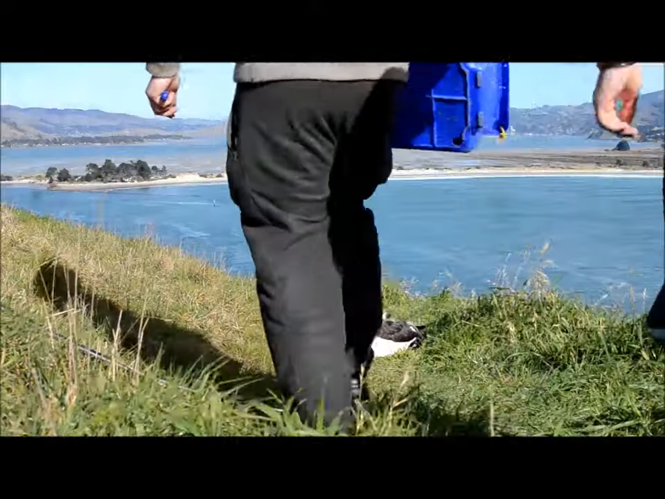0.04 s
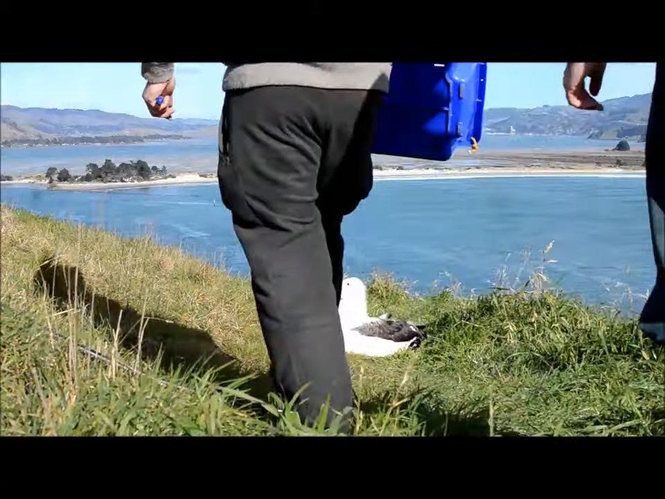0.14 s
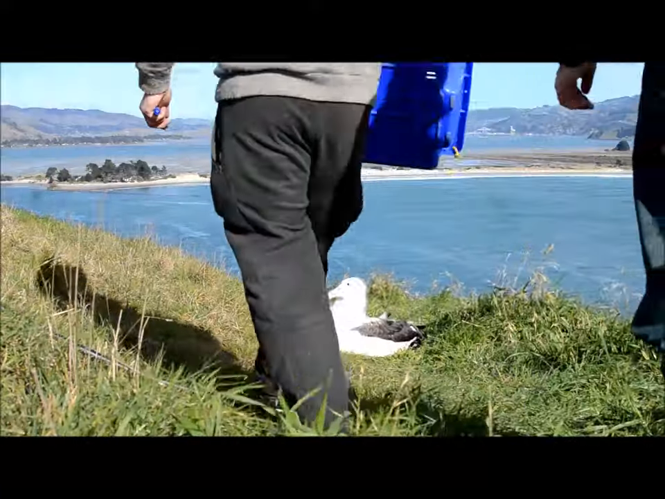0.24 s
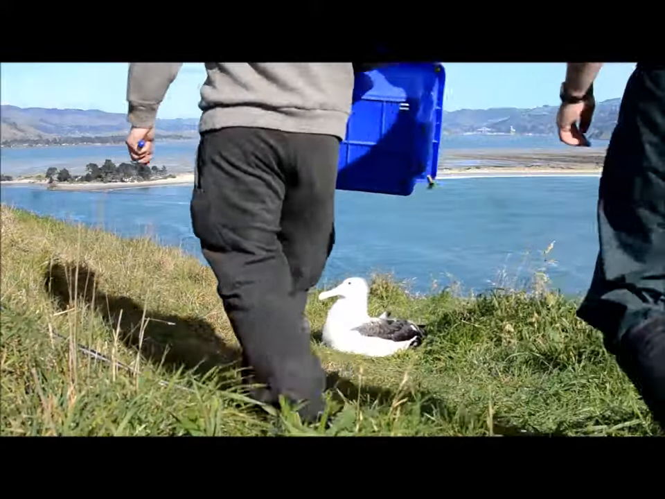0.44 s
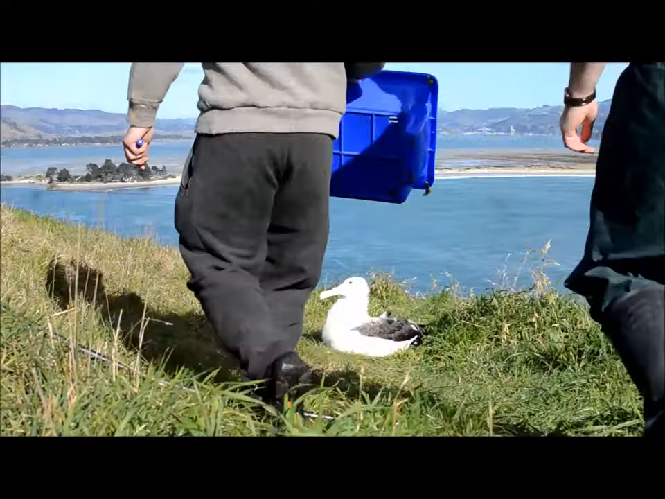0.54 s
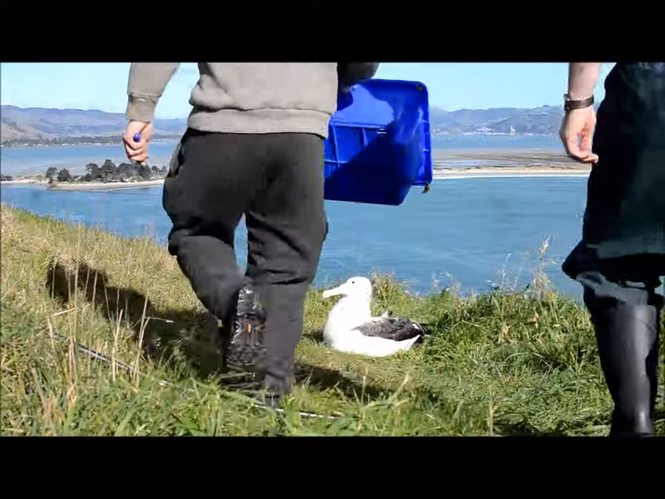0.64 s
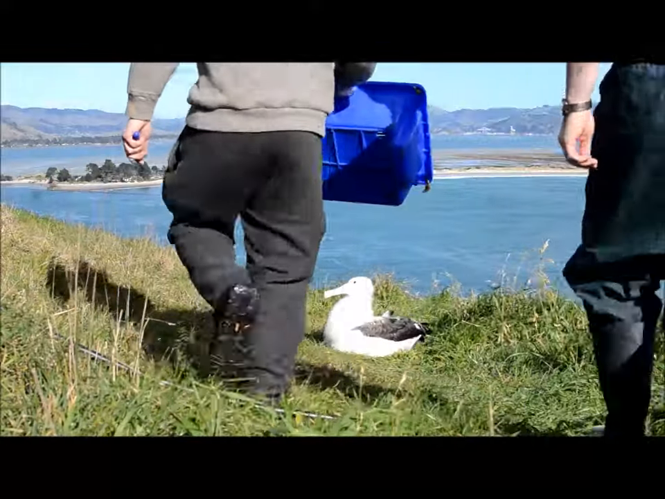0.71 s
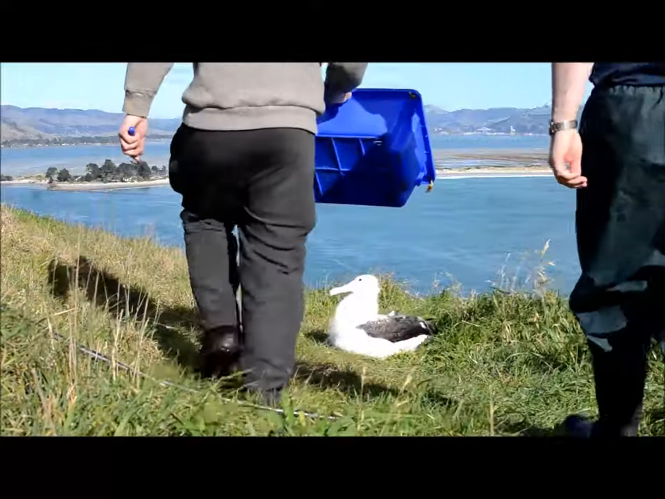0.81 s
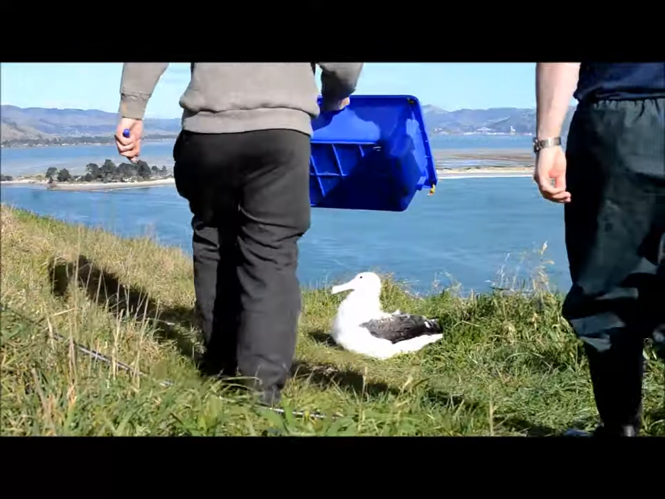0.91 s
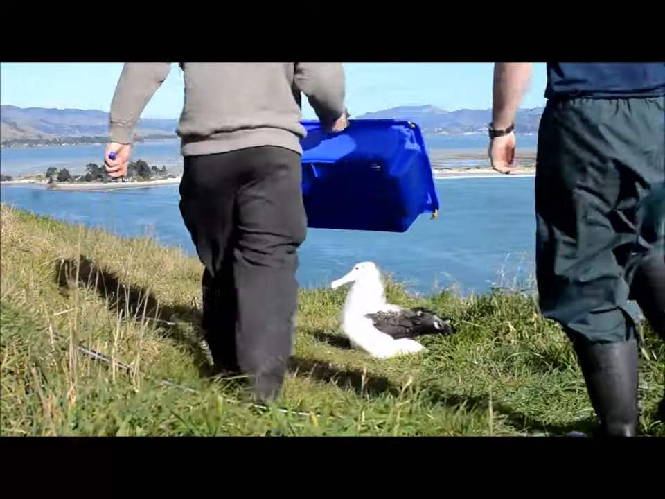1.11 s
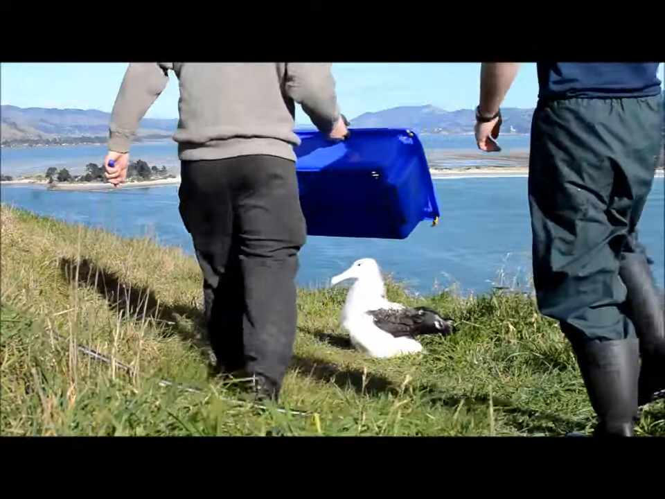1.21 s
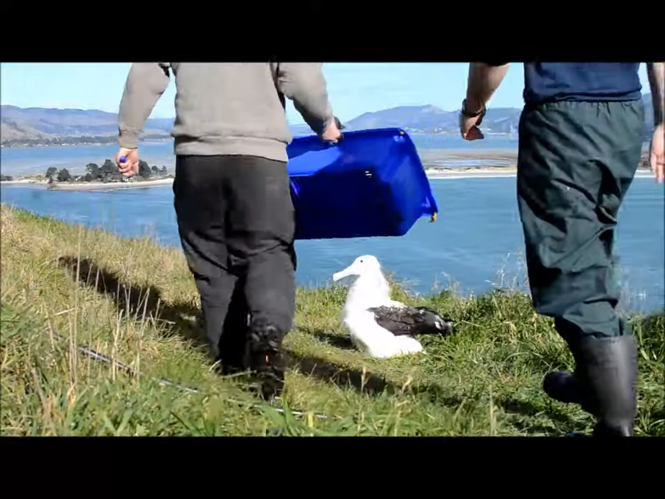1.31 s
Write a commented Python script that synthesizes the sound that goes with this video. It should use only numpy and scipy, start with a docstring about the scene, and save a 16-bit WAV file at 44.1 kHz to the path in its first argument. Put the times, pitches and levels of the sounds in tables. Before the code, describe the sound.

Wind thudding on the microphone, with people swishing faintly through long grass.

```python
"""Soft, dull thuds of wind on the microphone, out on an open hillside in long grass.
Gusts break into eddies right at the camera, over a low rumble; the strongest gust whistles faintly.
Just ahead two people walk: grass blades and trouser legs swish with the strides, and a few stalks tick.
Behind them the hillside hisses steadily. One microphone, mono."""
import sys
import numpy as np
from scipy.fft import rfft, irfft, next_fast_len
from scipy.io import wavfile
from scipy.ndimage import map_coordinates

SR = 44100
rng = np.random.default_rng(int(sys.argv[2]) if len(sys.argv) > 2 else 0)


def inscribe(sig):
    """Save sig as 16-bit PCM at rate SR to the path in sys.argv[1].

    A 1-D sig is mono; a 2-D sig holds one channel per row.
    Samples are clipped to [-1, 1] before scaling.
    """
    pcm = np.round(np.clip(np.atleast_2d(sig).T, -1, 1) * 32767)
    wavfile.write(sys.argv[1], SR, pcm.astype(np.int16))


N = 59535


def amp(db):
    """Decibels to gain."""
    return 10 ** (np.asarray(db) / 20)


def unit(x):
    """Scale to rms 1."""
    return x / np.sqrt(np.mean(x ** 2) + 1e-20)


def clock():
    """Time of each sample in seconds."""
    return np.arange(N) / SR


def curve(rows):
    """Join (seconds, value) rows with straight lines, one value per sample."""
    return np.interp(clock(), *np.transpose(rows))


def wobble(rate):
    """A smooth random curve, rate knots a second."""
    return map_coordinates(rng.standard_normal(N // 8), [clock() * rate], mode="wrap")


def filtered(x, response):
    """Pass x through a gain given as a function of frequency in Hz."""
    size = next_fast_len(N + 8192)
    return irfft(rfft(x, size) * response(np.fft.rfftfreq(size, 1 / SR)), size)[:N]


def noise(colour):
    """Noise of rms 1, coloured by (Hz, dB) rows."""
    knots_hz, db = np.transpose(colour)
    response = lambda hz: amp(np.interp(np.log(hz + 1), np.log(knots_hz), db))
    return unit(filtered(rng.standard_normal(N), response))


def eddy(length, bass_hz, corner_hz, size=4096):
    """One short random pressure swing of energy 1, held between its bass edge and its treble corner."""
    treble_order = 5.92  # steepness above the corner
    t = (np.arange(size) - size // 2) / SR
    hz = np.fft.rfftfreq(size, 1 / SR)
    window = np.exp(-.5 * np.abs(t / (.5 * length)) ** 3)
    swing = rng.standard_normal(size)
    for _ in range(3):  # flatten the spectrum while keeping the swing short
        swing = irfft(np.exp(1j * np.angle(rfft(swing * window))))
    u = 1j * hz / bass_hz
    highpass = u ** 2 / (1 + np.sqrt(2) * u + u ** 2)
    lowpass = (1 + (hz / corner_hz) ** 2) ** (-treble_order / 2)
    swing = irfft(rfft(swing * window) * highpass * lowpass)
    return swing / np.linalg.norm(swing)


def buffets():
    """Eddies thud right on the microphone; faster ones are louder and brighter."""
    # Each row: centre in seconds, length in seconds, level in dB, bass edge in Hz, treble corner in Hz.
    eddies = [(0.019, 0.0092, -48, 50, 780), (0.085, 0.017, -38.5, 169, 337),
              (0.145, 0.0068, -36, 59.7, 430), (0.1698, 0.0047, -20.5, 148, 483),
              (0.176, 0.007, -21, 111, 340), (0.2128, 0.0054, -18.5, 201.5, 470),
              (0.218, 0.0043, -15, 173, 410), (0.23, 0.0053, -19.5, 141, 496),
              (0.244, 0.0086, -20, 121, 964), (0.26, 0.014, -25, 50, 766), (0.285, 0.012, -18, 139, 1150),
              (0.2982, 0.014, -19.5, 91, 1140), (0.313, 0.012, -26.5, 50, 620),
              (0.321, 0.011, -22, 100, 785), (0.337, 0.0045, -10.5, 50, 1240),
              (0.344, 0.012, -16, 50, 1110), (0.354, 0.0038, -7, 50.4, 780),
              (0.363, 0.0057, -5, 50.5, 1210), (0.3681, 0.0035, -9, 120, 1950),
              (0.373, 0.011, -14, 140, 1220), (0.382, 0.0097, -29, 100, 870),
              (0.392, 0.0076, -10.5, 290, 1250), (0.4, 0.0029, -1.5, 91.5, 1213),
              (0.407, 0.022, -24.5, 90, 1120), (0.443, 0.007, -23, 50, 720),
              (0.452, 0.0078, -19.5, 140, 970), (0.467, 0.012, -26.5, 50.4, 660),
              (0.546, 0.02, -36.5, 119, 664), (0.599, 0.0054, -21.5, 118, 420),
              (0.629, 0.0096, -38, 122, 220), (0.699, 0.0066, -26.5, 164, 380),
              (0.713, 0.0062, -20, 115, 680), (0.718, 0.008, -22.5, 60.3, 330),
              (0.744, 0.0057, -17.5, 67.6, 513), (0.757, 0.0073, -13, 256, 970),
              (0.762, 0.006, -14, 48.4, 860), (0.828, 0.015, -32.5, 102, 734),
              (0.843, 0.0036, -15, 136, 557), (0.86, 0.011, -27, 70.4, 443), (0.906, 0.0093, -31, 70, 476),
              (1.089, 0.02, -45, 70, 270), (1.152, 0.0094, -36, 91, 323), (1.183, 0.0096, -27, 167, 316),
              (1.216, 0.0068, -30, 172, 730), (1.2268, 0.017, -28.5, 51.3, 464),
              (1.254, 0.034, -32, 68, 250), (1.289, 0.005, -38.5, 50, 450), (1.312, 0.011, -35, 166, 261)]
    trim_db = -1
    out = np.zeros(N + 2 * SR)  # a spare second at each end
    for s, length, db, bass_hz, corner_hz in eddies:
        swing = eddy(length, bass_hz, corner_hz)
        start = SR + round(s * SR) - len(swing) // 2
        out[start:start + len(swing)] += amp(db + trim_db) * np.sqrt(length * SR) * swing
    return out[SR:SR + N]


def rumble():
    """The lumpy low flow across the microphone between the eddies."""
    # Strength of the flow. Each row: time in seconds, level in dB.
    flow = [(0, -46.5), (.08, -42), (.12, -52), (.17, -42), (.21, -38), (.26, -33.5), (.32, -23.5),
            (.348, -18.5), (.375, -28), (.47, -33), (.5, -57.5), (.6, -34.5), (.66, -51.5), (.72, -32.5),
            (.79, -36.5), (.86, -35), (.92, -44), (.96, -67), (1.01, -51), (1.13, -55), (1.2, -40.5),
            (1.25, -32), (1.29, -51.5), (1.35, -54)]
    # Its colour. Each row: frequency in Hz, relative level in dB.
    colour = [(15, -24), (35, -4), (62, -1), (140, -1.5), (250, -16.5), (500, -23), (1000, -49),
              (3000, -85)]
    lump_db = 3.5
    return amp(curve(flow) + lump_db * wobble(rate=55)) * noise(colour)


def microphone(pressure):
    """The strongest eddies drive the microphone into soft overload; its port dulls them."""
    overload, port_hz = .92, 3460
    rounded = pressure / (1 + (pressure / overload) ** 6) ** (1 / 6)
    return filtered(rounded, lambda hz: 1 / (1 + (hz / port_hz) ** 4))


def brush(centre_s, spread_s, hz, octaves, glide=0):
    """A band of friction noise that swells and fades, its pitch gliding with the rubbing speed."""
    bell = lambda f: np.exp(-.5 * (np.log2((f + 1) / hz) / octaves) ** 2)
    band = unit(filtered(rng.standard_normal(N), bell))
    t = clock() - centre_s
    speed = 2 ** (glide * np.clip(t, -3 * spread_s, 3 * spread_s))
    travel = np.cumsum(speed)
    travel += N / 2 - np.interp(0, t, travel)  # the swell peaks midway through the noise
    swell = np.exp(-.5 * (t / spread_s) ** 2)
    return map_coordinates(band, [travel], order=5) * swell


def rustle():
    """Grass blades and cloth rub in a fine grain, just ahead of the camera."""
    # Rise and fall with the strides. Each row: time in seconds, level in dB before the trim.
    levels = [(0.0, -52), (0.168, -62), (0.254, -55), (0.292, -59), (0.424, -61), (0.5, -55.5),
              (0.51, -48.5), (0.548, -62.5), (0.564, -54), (0.612, -62.5), (0.856, -62), (0.864, -65),
              (1.052, -53.5), (1.066, -60), (1.09, -52.5), (1.108, -60), (1.274, -72), (1.35, -61.5)]
    # Colour of the blades. Each row: frequency in Hz, relative level in dB.
    blades = [(300, -8), (900, 3.5), (2000, -2.5), (3500, -1), (5000, -0.5), (8200, 0), (10500, -6),
              (12500, -16.5), (15500, -24)]
    trim_db, grain_db = 5.5, 2.5
    grainy = unit(noise(blades) * amp(grain_db * wobble(rate=890)))
    return amp(curve(levels) + trim_db) * grainy


def swishes():
    """Trouser legs brush past the long grass."""
    # Each row: centre in seconds, spread in seconds, level in dB, centre pitch in Hz,
    # width in octaves, glide in octaves a second.
    strokes = [(0.0082, 0.0083, -36.5, 5840, 0.031, -1.5), (.02, 0.01, -47.5, 5300, .2, -13),
               (.012, 0.013, -58, 11000, 0.076, -6), (0.00995, 0.014, -47, 597, 0.23, 0.5),
               (.458, 0.0061, -48, 3660, 0.074, -4), (0.5, 0.014, -50, 1650, 1, 0),
               (.496, 0.013, -52.5, 4100, .2, 5.5), (0.516, 0.0088, -42, 5300, 0.082, 4.5),
               (0.519, 0.0074, -52.5, 10600, 0.064, 9.5), (.98, 0.014, -55.5, 7140, 0.12, 6.5),
               (1.02, 0.02, -62, 1100, 0.44, 4), (1.05, .014, -54, 7300, 0.14, -7.5),
               (1.068, .012, -56, 3300, 0.084, 3), (1.086, .007, -51.5, 4180, 0.073, -0.5),
               (1.118, 0.015, -52.5, 2830, 0.29, -4), (1.03, 0.034, -65, 11000, 0.31, -1.5),
               (1.137, 0.0039, -55.5, 6500, .05, -2)]
    return sum(amp(db) * brush(s, spread, hz, octaves, glide)
               for s, spread, db, hz, octaves, glide in strokes)


def ticks():
    """Stalks and seams tick as the walkers pass through."""
    # Each row: time in seconds, level in dB, centre pitch in Hz.
    stalks = [(.05, -40, 1670), (.246, -48.5, 4180), (0.498, -38.5, 930), (0.6, -43, 1810),
              (.69, -58, 9000), (1.007, -49.5, 1880), (1.083, -45, 1690), (1.147, -46, 1560)]
    return sum(amp(db) * brush(s, spread_s=.0024, hz=hz, octaves=.72) for s, db, hz in stalks)


def whistle():
    """A faint, fluttering whistle at the height of the strongest gust."""
    flutter_hz, flutter_depth = 56, .79
    tone = amp(-47.5) * brush(centre_s=.33, spread_s=.045, hz=2130, octaves=.063)
    flutter = 1 + flutter_depth * np.sin(2 * np.pi * flutter_hz * clock())
    return tone * flutter


def hillside():
    """Steady wind hisses over the hill, behind everything else."""
    # Colour of the air. Each row: frequency in Hz, relative level in dB.
    colour = [(20, 4.5), (100, 1.5), (400, -2), (800, -1), (1300, -5), (2200, -12.5), (4000, -17),
              (9000, -31), (15000, -45)]
    return amp(-51.5) * noise(colour)


def scene():
    """Open air, one microphone: wind right on it, the walkers close ahead, the hill all round."""
    wind = microphone(buffets() + rumble())
    air = whistle() + hillside()
    strides = rustle() + swishes() + ticks()
    return (wind + air + strides)[None]


def record(dry):
    """The camera has two narrow dips in the treble and keeps nothing above its band limit."""
    # Each row: centre of the dip in Hz, half-width in Hz, depth from 0 to 1.
    notches = [(5740, 260, 0.73), (6960, 150, 0.6)]
    top_hz = 15780

    def response(hz):
        dips = [1 - depth * np.exp(-((hz - centre) / width) ** 2) for centre, width, depth in notches]
        return np.prod(dips, axis=0) * (hz < top_hz)
    return filtered(dry[0], response)[None]


dry = scene()
out = record(dry)
inscribe(out)
```